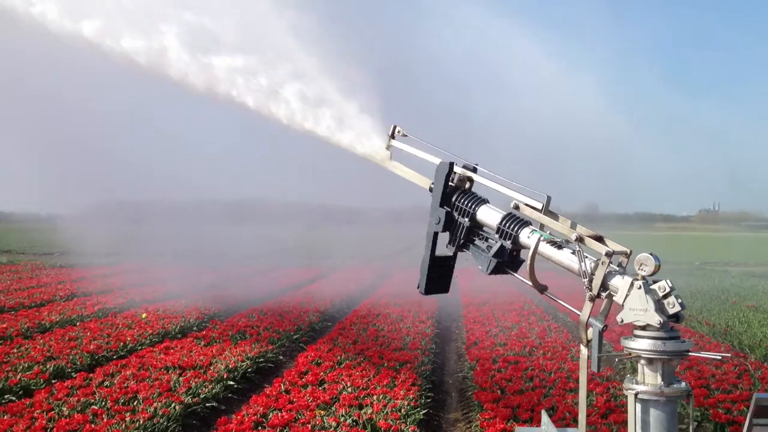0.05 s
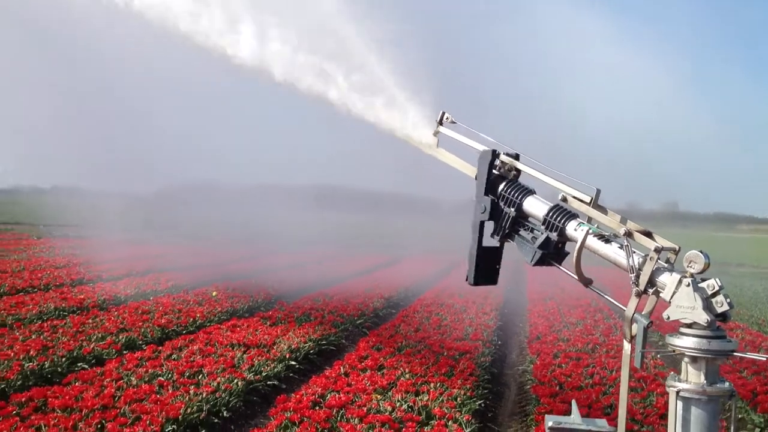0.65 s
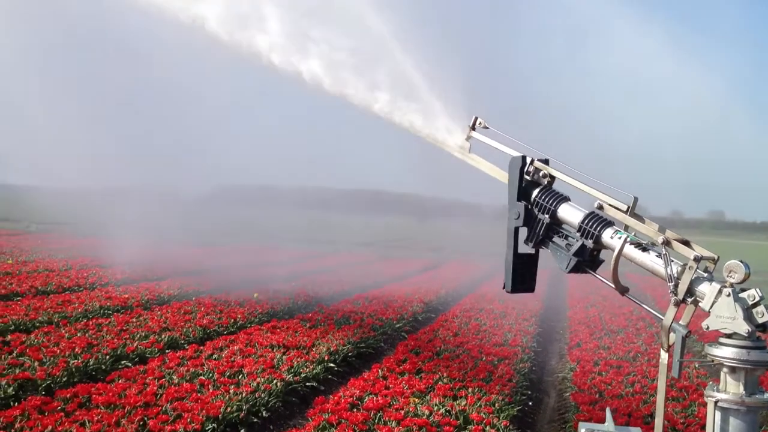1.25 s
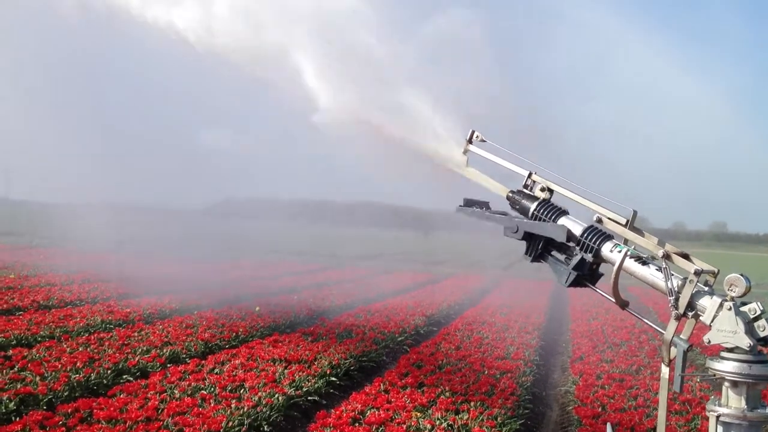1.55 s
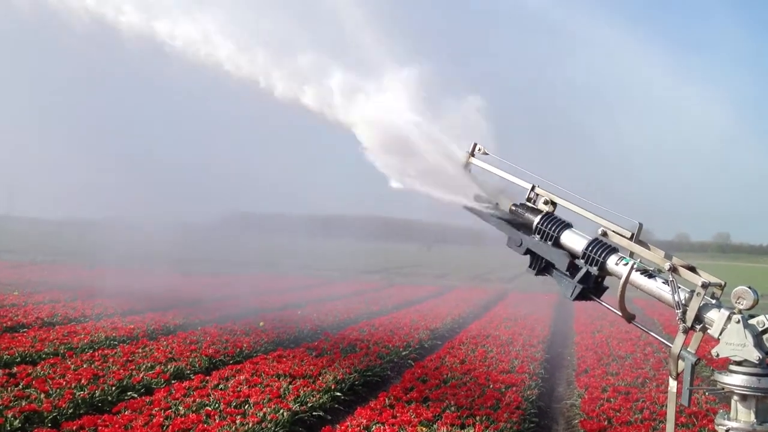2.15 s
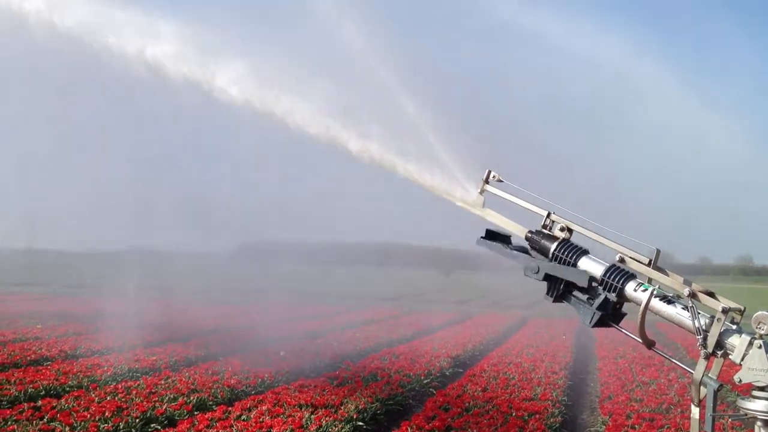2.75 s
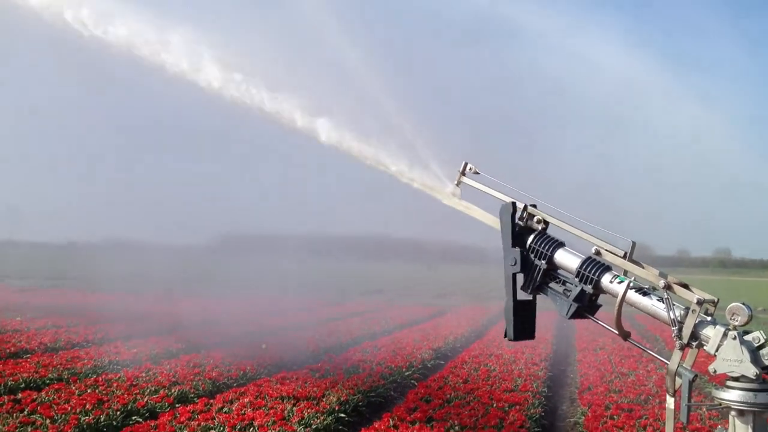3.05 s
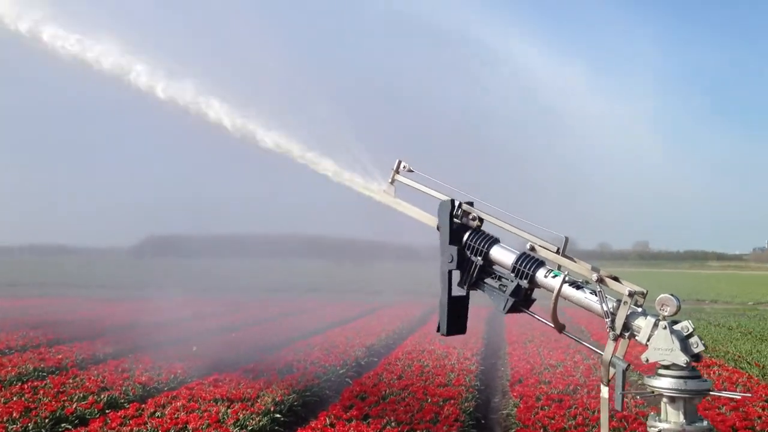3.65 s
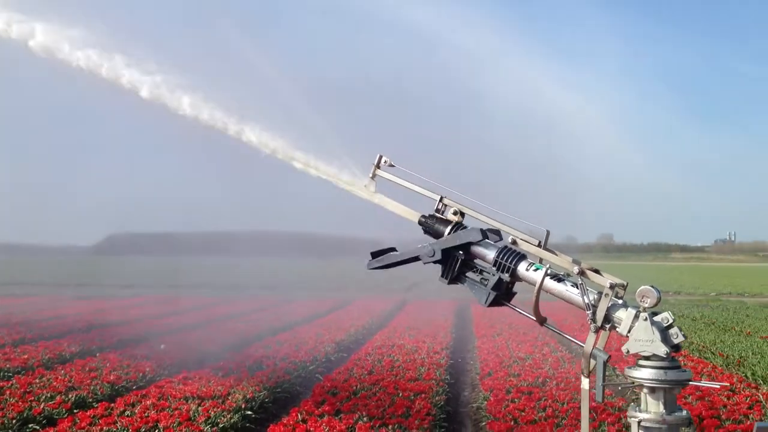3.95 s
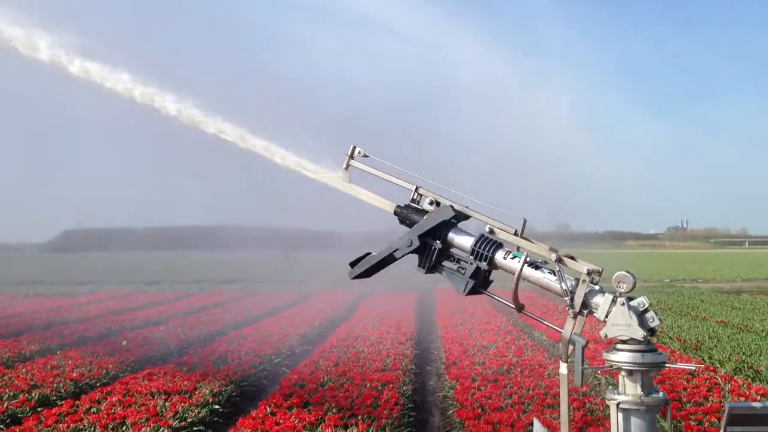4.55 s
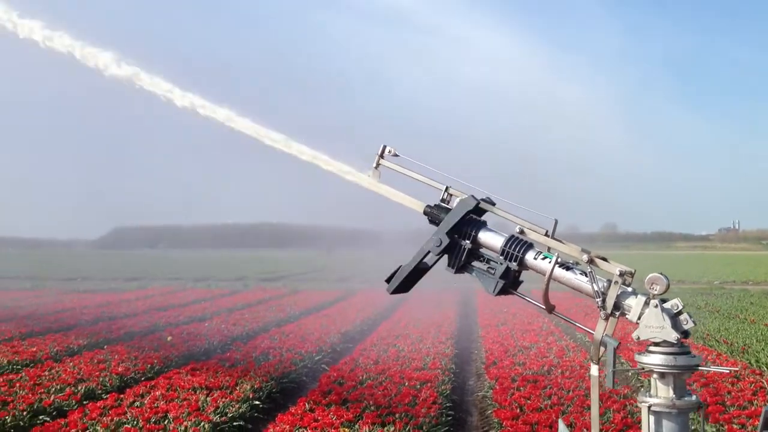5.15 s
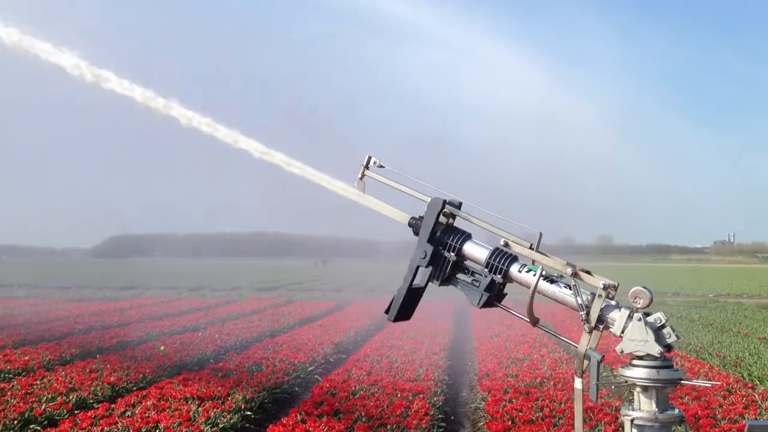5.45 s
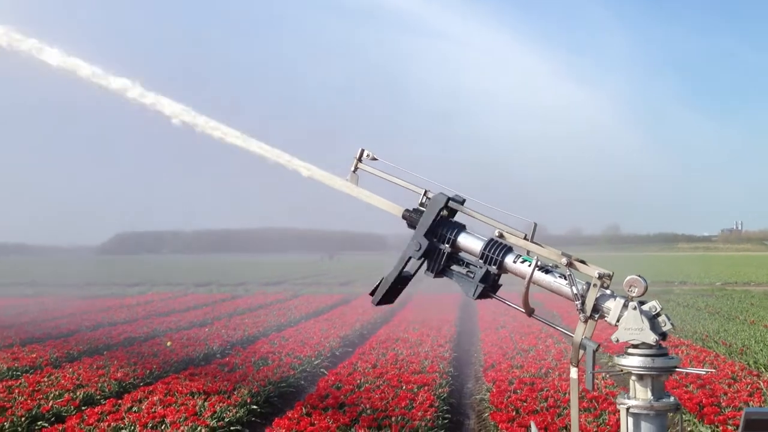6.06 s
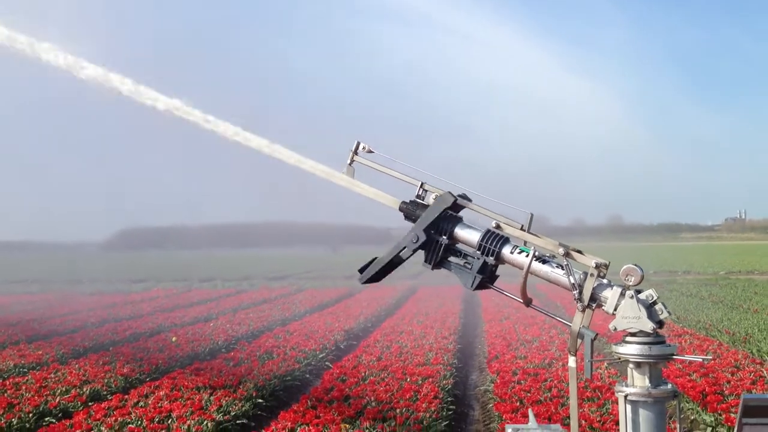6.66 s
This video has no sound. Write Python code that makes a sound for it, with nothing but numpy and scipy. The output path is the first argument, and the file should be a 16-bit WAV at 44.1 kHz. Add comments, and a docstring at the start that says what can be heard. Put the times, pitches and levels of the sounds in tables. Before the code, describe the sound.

A powerful sprinkler gun sprays over an open field, heard from an arm's length away. From the start the jet makes a loud, bright, crackling hiss with a hollow tone and faint shifting whistles inside it. At about 0.3 seconds the swing arm slaps through the water, and it repeats evenly every 0.63 seconds, eleven times in all, each a short wet smack with a brief splash. Small bright spits of water crackle near 1.3, 2.4, 4.9 and 5.6 seconds. The hiss drops suddenly at about 4.8 seconds and again at 5.4, becoming a softer, smoother rush as its hollow tone rises and fades. The slaps and splashes then stand out clearly until the end, near 7 seconds. Wind buffets the microphone with irregular low thumps, strongest around 3.7, 4.9 and 5.6 seconds, then settles to a faint breeze.

```python
"""A big sprinkler gun throws its hissing jet over an open field, an arm's length from the microphone.
A breaker pin tears the jet into crackling spray and is slowly drawn out: its depth sets the level,
colour and hollow pitch of the hiss. The swing arm slaps through the jet about every 0.63 s.
Nearby surfaces tint the water sounds with short echoes, and wind buffets the microphone."""
import sys
import numpy as np
from scipy import signal
from scipy.fft import rfft, irfft, next_fast_len
from scipy.io import wavfile
from scipy.ndimage import uniform_filter1d

SR = 44100
rng = np.random.default_rng(int(sys.argv[2]) if len(sys.argv) > 2 else 0)


def put_to_file(sound):
    """Save the sound as 16-bit audio at rate SR, in the file named by the first command-line argument."""
    columns = np.atleast_2d(sound).T  # one column per channel
    safe = np.clip(columns, -1, 1)
    whole_steps = np.round(safe * 32767)
    wavfile.write(sys.argv[1], SR, whole_steps.astype(np.int16))


N = 304290
TIME = np.arange(N) / SR

# gusts that hit the microphone: t/s, level/dB, half length/s
GUSTS = [(0.224, -40, .018), (1.154, -35.5, .019), (1.257, -35.5, 0.065), (1.72, -39.5, .035),
         (2.697, -40, .02), (3.49, -40, .04), (3.685, -30, .035), (4.22, -37.5, .04), (4.294, -29, 0.0067),
         (4.715, -38, .016), (4.912, -29.5, 0.039), (5.291, -36.5, 0.012), (5.457, -38, 0.063),
         (5.628, -29.5, 0.035)]
# colour of the wind (how strong its low and high parts are): f/Hz, level/dB
WIND_COLOUR = [(25, -26), (50, -23), (90, -7), (140, 0.5), (200, 2), (300, -11.5), (450, -20), (800, -33),
               (2000, -67)]
# echoes from nearby surfaces: lag before sway/ms, gain, band centre f/Hz, band sharpness Q
ECHOES = [(2.263, -0.42, 385, 0.43), (1.499, -0.2, 1330, 0.54), (1.097, -0.19, 1330, 4.2),
          (1.841, -0.22, 6700, 1.9)]
# the microphone sways and scales all echo lags: t/s, factor
MIC_SWAY = [(1.5, 1), (2.55, .986), (3.7, .949), (5.1, .973), (6.5, .957)]
# slugs of water that burst on the pin: t/s, level/dB, fade time/s
SPITS = [(1.285, -24, 0.02), (2.325, -20, .0012), (2.360, -24, .002), (2.394, -18, .004),
         (4.858, -24, 0.0033), (5.568, -28, .002)]
# strength of each slap of the arm, in order: level/dB
SLAP_LEVELS = [-20.5, -18.5, -21.5, -21, -23, -23, -23.5, -23, -21, -21.5, -21.5]
# colour of a slap: f/Hz, level/dB
SLAP_COLOUR = [(60, -24), (180, -6), (420, -10.5), (1000, -6.5), (1300, -6.5), (1600, -4.5), (3200, -5),
               (4500, -2.5), (6000, -2.5), (7400, 3), (8900, -5.5), (10000, -13), (11500, -9.5),
               (15000, -14)]
# the pin is drawn out, the last of it in two jerks: t/s, depth (0 clear of the jet, 1 grazing, 2 deep)
PIN_DEPTH = [(0, 3), (.6, 1.95), (2.1, 1.42), (2.7, 1.46), (3.2, 1.28), (4.4, .97), (4.77, 1.1),
             (4.8, 0.47), (4.88, 0.57), (5.4, 0.66), (5.43, 0.05), (5.65, 0.19), (6.2, 0), (6.9, .02)]
# flow tones at the pin: f/Hz, width/Hz, level against the hiss before trim/dB, depth where loudest
PIN_TONES = [(4750, 180, -14, 1.6), (2834, 190, -17, 1.66), (4360, 220, -15.5, 1.26),
             (3110, 130, -22, 1.24), (5420, 210, -10, 1.12), (3900, 160, -21, 0.97), (5960, 180, -12, 1.03),
             (2950, 160, -15.5, 0.92), (3560, 420, -11.5, 0.51)]
# colour of the hiss with the pin clear, grazing and deep: f/Hz, level/dB
FREE_JET = [(60, -42), (180, -11.5), (420, -4.5), (1300, -6.5), (2000, -7.5), (3200, -4), (4500, -2.8),
            (5600, -6), (7000, 0.5), (8600, -1.3), (9700, -8.5), (11200, -10.5), (12800, -6), (15000, -12)]
GRAZED_JET = [(60, -21), (180, -14.5), (420, -11.5), (1300, -12), (1800, -9), (3500, -5), (4400, -3.5),
              (5000, -3), (5500, -3.5), (7150, 2.5), (8700, -1), (9800, -7), (12000, -7), (15000, -10)]
BROKEN_JET = [(60, -24), (180, -12), (420, -6.5), (1000, -6), (1400, -7.5), (3300, -7), (4150, -4.5),
              (4750, -2), (5400, -6.5), (7350, 0.5), (8900, -5), (10200, -9), (11400, -5), (15000, -9)]


def undb(db):
    """Turn decibels into a gain."""
    return 10 ** (np.asarray(db) / 20)


def unit(x):
    """Scale to an average strength (rms) of 1."""
    return x / np.sqrt(np.mean(x ** 2))


def curve(table):
    """Join (time, value) points with straight lines."""
    return np.interp(TIME, *np.transpose(table))


def bell(x, centre, span):
    """A smooth hump: 1 at the centre, about a third one span away."""
    return np.exp(-((x - centre) / span) ** 2)


def wander(rate):
    """A smooth random wobble of size 1 that turns about `rate` times a second."""
    step = max(int(SR / rate), 1)
    stairs = np.repeat(rng.standard_normal(N // step + 1), step)
    return unit(uniform_filter1d(stairs, step)[:N])


def colour(x, points):
    """Shape a sound with a colour table, then scale it to strength 1."""
    hz, db = np.transpose(points)
    size = next_fast_len(N)
    bin_hz = np.maximum(np.fft.rfftfreq(size, 1 / SR), 1)
    gain = undb(np.interp(np.log(bin_hz), np.log(hz), db))
    return unit(irfft(rfft(x, size) * gain, size)[:N])


def soft_filter(x, hz, kind):
    """Gently keep the "low" or the "high" side of a frequency."""
    return signal.sosfilt(signal.butter(2, hz, kind, fs=SR, output="sos"), x)


def bandpass(x, hz, q):
    """Keep one band around hz; a higher q makes it narrower."""
    k = np.tan(np.pi * hz / SR)
    return signal.lfilter([k / q, 0, -k / q], [1 + k / q + k * k, 2 * (k * k - 1), 1 - k / q + k * k], x)


def wind(breeze_db=-51, lull_s=5.75, lull_db=-3, wake_db=-16, wake_s=0.11):
    """Swirls of air thump on the microphone over a puffy breeze; the hardest add a higher rasp."""
    power = undb(breeze_db + lull_db * (TIME > lull_s) + 3 * wander(14)) ** 2
    for start, db, half_s in GUSTS:
        power += undb(db) ** 2 * bell(TIME, start, half_s)
        power += undb(db + wake_db) ** 2 * bell(TIME, start, wake_s)  # weaker air around the gust
    strength = np.sqrt(power)
    thump = colour(rng.standard_normal(N) * undb(3 * wander(90)), WIND_COLOUR)
    rasp = bandpass(rng.standard_normal(N), hz=360, q=0.92)
    rasp = unit(soft_filter(rasp, hz=506, kind="low"))
    return strength * (thump + undb(-13) * strength / strength.max() * rasp)


def add_echoes(x):
    """Close echoes boost some pitches and cancel others; the pattern slides as the microphone sways."""
    sway = curve(MIC_SWAY)
    out = x
    for lag_ms, gain, hz, q in ECHOES:
        lag_s = sway * lag_ms / 1000
        out = out + gain * np.interp(TIME - lag_s, TIME, bandpass(x, hz, q))
    return out


def spray(drops_per_s, spread_db, drops_db, flutter_db, flutter_rate, flicker_db=2.7, flicker_rate=45):
    """Mist hisses and drops tick; it all flutters as the water breaks into lumps."""
    sizes = undb(spread_db * np.minimum(rng.exponential(size=N), np.pi))
    drops = (rng.random(N) < drops_per_s / SR) * sizes * rng.choice([-1, 1], N)
    mist = rng.standard_normal(N)
    size = next_fast_len(N)
    spectrum = rfft(mist + undb(drops_db) * unit(drops), size)
    # each half-octave band from 500 Hz up flickers on its own; the bass joins the first
    band = np.floor(2 * np.log2(np.maximum(np.fft.rfftfreq(size, 1 / SR) / 500, 1)))
    water = np.zeros(N)
    for k in np.unique(band):
        water += irfft(spectrum * (band == k), size)[:N] * undb(flicker_db * wander(flicker_rate))
    return water * undb(flutter_db * wander(flutter_rate))


def spits():
    """Now and then a slug of water bursts on the pin with a short, bright crackle."""
    bursts = sum(undb(db) * (TIME >= t) * np.exp(-abs(TIME - t) / fade_s) for t, db, fade_s in SPITS)
    hiss = colour(rng.standard_normal(N), BROKEN_JET)
    return bursts * soft_filter(hiss, hz=2500, kind="high")


def swing_arm(depth, first_strike_s=0.323, swing_s=0.62404, swing_growth_s=0.00068):
    """The arm swings like a pendulum and slaps through the jet; the water it throws aside splashes on."""
    entry_s, wet_s, release_s = 0.0036, 0.031, 0.016
    splash_s, splash_fade_s = 0.077, 0.014
    slap, splash = np.zeros((2, N))
    strike_s = first_strike_s
    for swing, db in enumerate(SLAP_LEVELS):
        age = TIME - strike_s
        full_s = 0.012 + 0.0038 * np.interp(strike_s, TIME, depth)  # builds more slowly in a torn jet
        stages_s = [0, entry_s, full_s, wet_s, wet_s + release_s]
        slap += undb(db) * np.interp(age, stages_s, [0, undb(-4), 1, undb(-5), 0])
        splash += np.interp(age, [0, wet_s, splash_s, splash_s + splash_fade_s], [0, 1, 1, 0])
        strike_s += swing_s + swing * swing_growth_s
    impact = spray(drops_per_s=3000, spread_db=1, drops_db=-2.5, flutter_db=1.5, flutter_rate=450,
                   flicker_db=0.8, flicker_rate=150)
    sheet = spray(drops_per_s=2000, spread_db=1.5, drops_db=-1, flutter_db=1.0, flutter_rate=300)
    splash *= undb(-30.5 - 3 * depth)  # the more whole the jet, the more water is thrown aside
    return slap * colour(impact, SLAP_COLOUR) + splash * colour(sheet, GRAZED_JET)


def flow_tone(hz, width_hz, spurt_db, spurt_rate=35):
    """Churning water smears a tone into a band of noise that comes in spurts."""
    real, imag = soft_filter(rng.standard_normal((2, N)), hz=width_hz / 2, kind="low")
    pure_tone = np.exp(2j * np.pi * np.cumsum(hz * np.ones(N)) / SR)
    smeared = np.real((real + 1j * imag) * pure_tone)
    return unit(smeared * undb(spurt_db * wander(spurt_rate)))


def jet(depth, free_db=-37, split_db=-27.5, split_depth=1.157, tone_trim_db=-0.9):
    """The pin tears the jet into hissing spray, and the water sings as it parts around the pin."""
    # the hiss grows with depth until the pin splits the whole jet, then eases a little
    level_db = np.interp(depth, [0, split_depth], [free_db, split_db])
    level_db -= 0.64 * np.maximum(depth - split_depth, 0)
    water = spray(drops_per_s=1500, spread_db=3.5, drops_db=-5, flutter_db=0.43, flutter_rate=260,
                  flicker_db=0.79)
    water *= undb(0.4 * wander(25.06))
    hiss = np.zeros(N)
    for stage, points in enumerate([FREE_JET, GRAZED_JET, BROKEN_JET]):
        share = np.maximum(1 - abs(np.clip(depth, 0, 2) - stage), 0)
        hiss += share * colour(water, points)
    # a hollow tone rises in pitch as the pin leaves, and stands out most near a graze
    deep_hz, free_hz = 2170, 3770
    hollow_hz = deep_hz + (free_hz - deep_hz) * bell(depth, centre=0, span=0.77)
    hollow_gain = undb(-11.5) * bell(depth, centre=0.89, span=1.2)
    tones = hollow_gain * flow_tone(hollow_hz, width_hz=314, spurt_db=1.2)
    for hz, width_hz, db, best_depth in PIN_TONES:
        gain = undb(db + tone_trim_db) * bell(depth, best_depth, span=0.21)
        tones += gain * flow_tone(hz, width_hz, spurt_db=2.1)
    return undb(level_db) * (hiss + tones)


def scene():
    """The sprinkler with its echoes, plus wind, in one channel."""
    depth = curve(PIN_DEPTH)
    sprinkler = jet(depth) + spits() + swing_arm(depth)
    return (add_echoes(sprinkler) + wind())[None]


def record(dry, bass_hz=74, top_hz=15330):
    """Thin the deep bass and sharply cut the highest treble."""
    thinned = soft_filter(dry, bass_hz, kind="high")
    return signal.sosfilt(signal.ellip(14, .1, 75, top_hz, fs=SR, output="sos"), thinned)


dry = scene()
out = record(dry)
put_to_file(out)
```